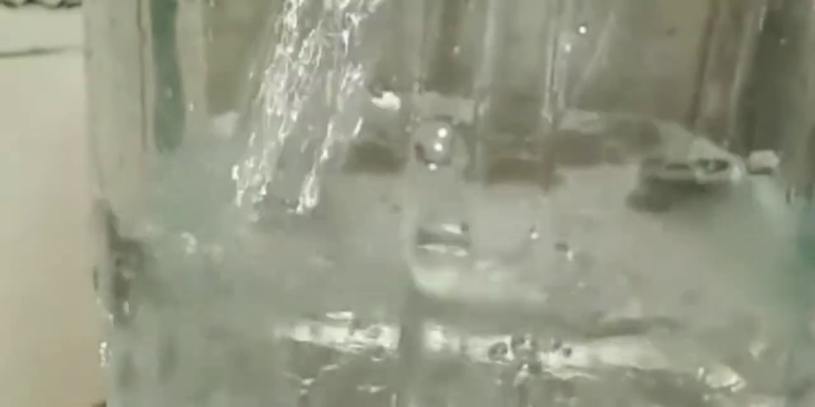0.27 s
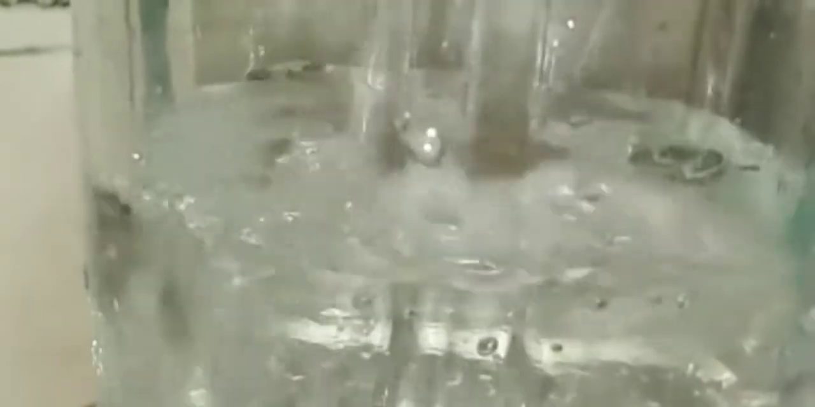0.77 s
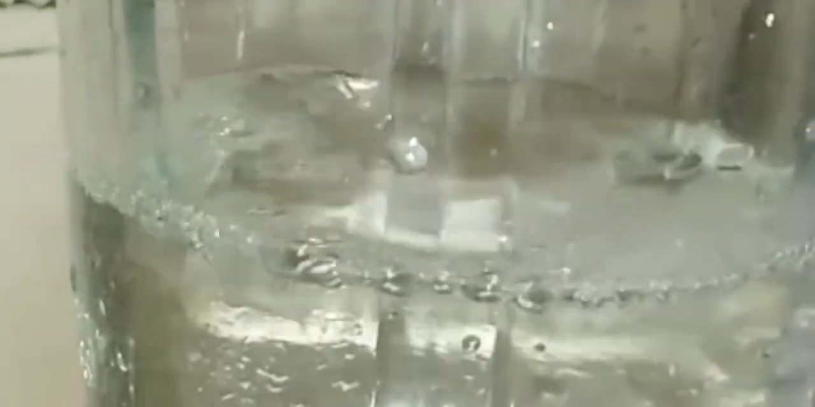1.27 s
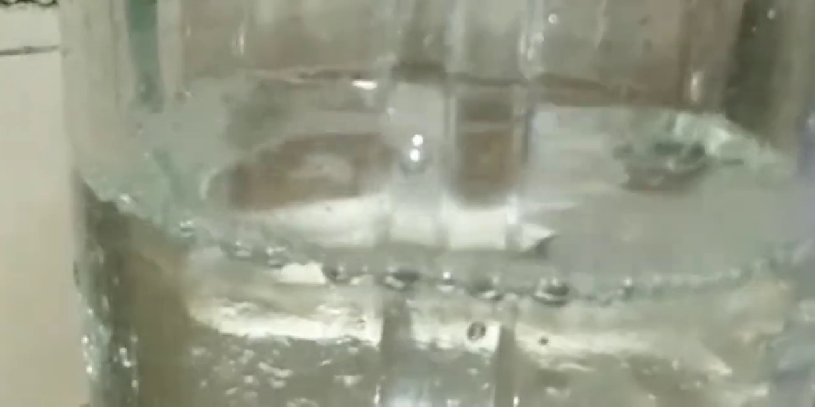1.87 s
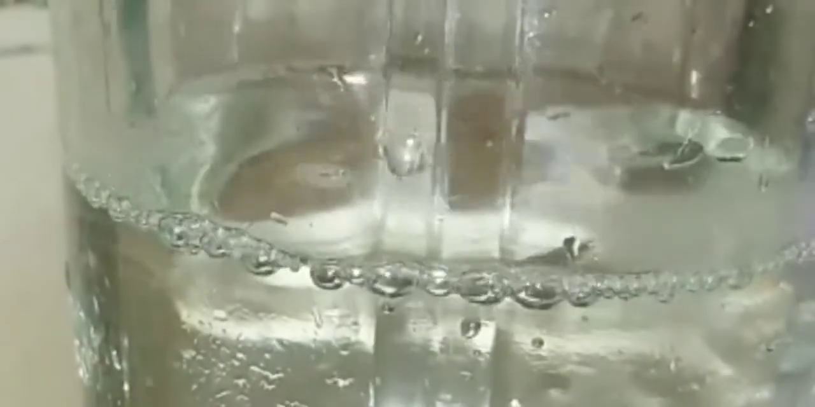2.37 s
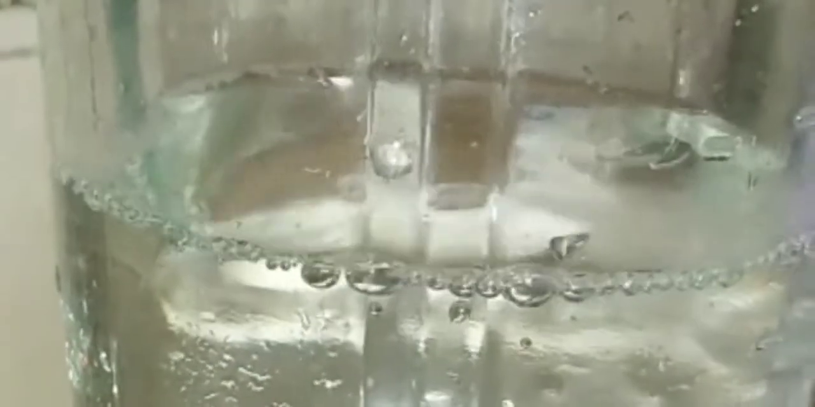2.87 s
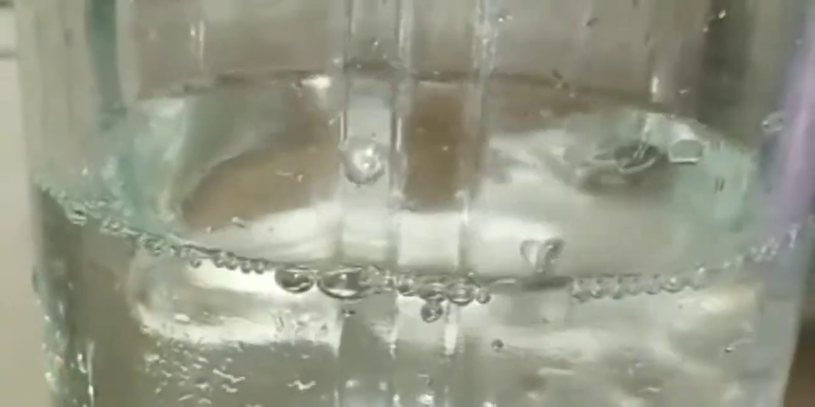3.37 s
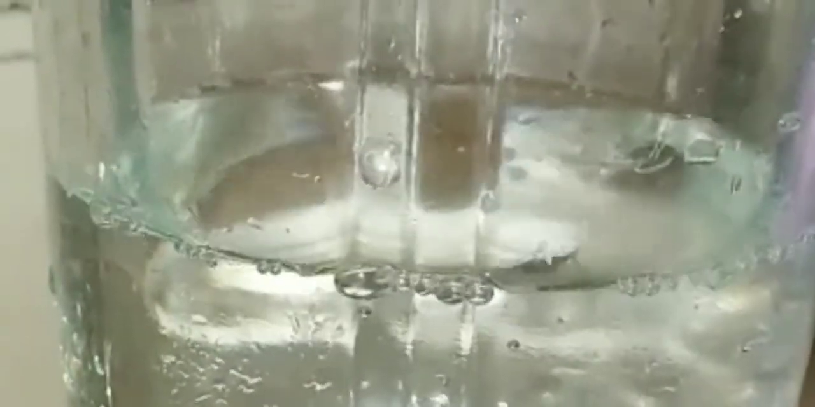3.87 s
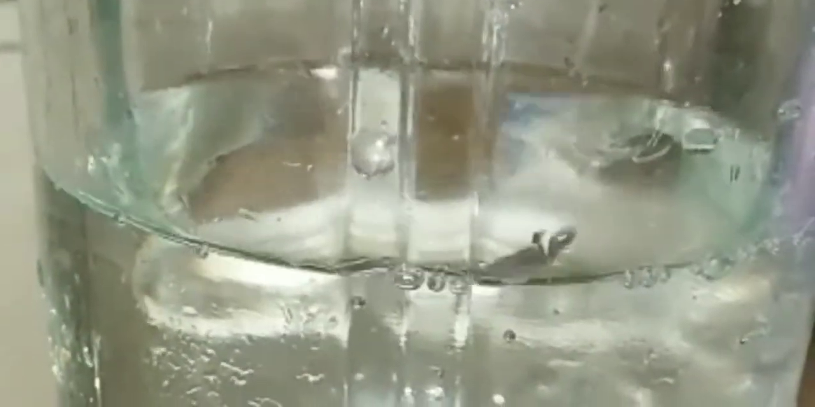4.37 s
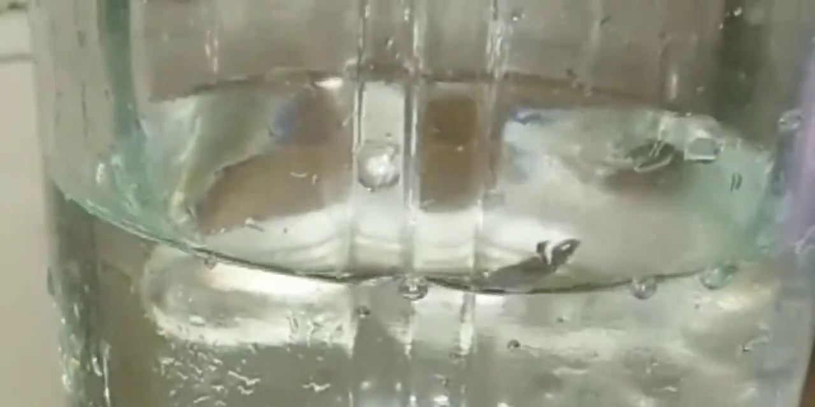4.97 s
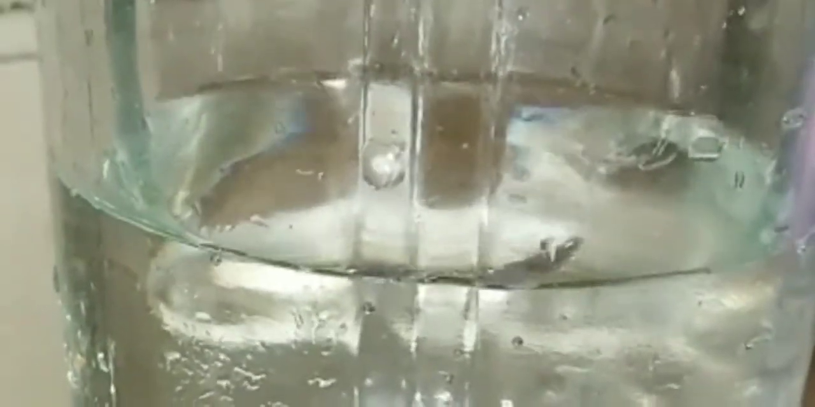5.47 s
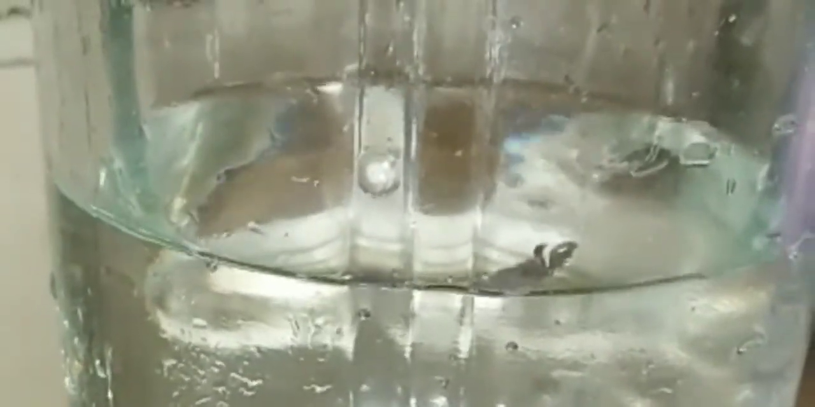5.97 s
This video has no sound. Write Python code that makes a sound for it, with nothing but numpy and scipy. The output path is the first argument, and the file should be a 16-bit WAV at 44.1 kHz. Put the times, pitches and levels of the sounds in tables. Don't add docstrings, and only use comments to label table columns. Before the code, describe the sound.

A nearby phone microphone catches a short, bubbly pour into a glass vessel, swelling slightly and then cut with a tiny dip. Round drips, wet slaps and a rustling slosh follow, with a low thump on the counter. Dull metal touches lead into two piercing, slightly overloaded glass clinks and a short rattle. Then only quiet hum, hiss and faint pipe sounds remain, before a soft brush and a loud wooden knock.

```python
import sys
import numpy as np
from scipy import signal
from scipy.fft import rfft, irfft, next_fast_len
from scipy.io import wavfile
from scipy.ndimage import uniform_filter1d

SR = 44100
rng = np.random.default_rng(int(sys.argv[2]) if len(sys.argv) > 2 else 0)


def gain_from_db(level_db):
    decades = np.asarray(level_db, float) / 20
    return 10 ** decades


def to_wav(sig):
    pcm = np.clip(np.atleast_2d(sig), -1, 1) * 32767
    pcm = np.round(pcm).astype(np.int16)
    wavfile.write(sys.argv[1], SR, pcm.T)


N = 274919
T = np.arange(N) / SR
FADE = np.log(1000)
CUT_S = 1.029


def level(x, db):
    return x * gain_from_db(db) / np.sqrt(np.mean(x ** 2))


def shape(x, gain):
    size = next_fast_len(len(x))
    hz = np.arange(size // 2 + 1) * SR / size + 1
    return irfft(rfft(x, size) * gain(hz), size)[:len(x)]


def colour(points):
    hz, db = np.transpose(points)
    return lambda f: gain_from_db(np.interp(np.log(f), np.log(hz), db))


def peak(hz, width):
    return lambda f: 1 / np.sqrt(1 + ((f - hz * hz / f) / width) ** 2)


def hiss(gain):
    return level(shape(rng.standard_normal(N), gain), 0)


def walk(rate):
    k = int(SR / rate)
    steps = np.repeat(rng.standard_normal(N // k + 1), k)
    return 1.6 * uniform_filter1d(steps, k)[:N]


def swell(s, db, rise, fall):
    return gain_from_db(db - 20 * np.maximum((s - T) / rise, (T - s) / fall))


def add(out, s, x):
    i = int(s * SR)
    out[i:i + len(x)] += x[:len(out) - i]


def ring(hz, t60, glide=0., size=4096):
    t = T[:size]
    return np.sin(2 * np.pi * hz * t * (1 + glide * t / t60)) * np.exp(-FADE * t / t60)


def puff(noise, hz, width, t60):
    t = T[:len(noise)]
    band = shape(noise, lambda f: peak(hz, width)(f) ** 2)
    x = band * np.exp(-FADE * t / t60) * np.minimum(t / 0.00097, 1)
    return x / np.abs(x).max()


def struck(force, modes):
    response = sum(gain_from_db(db) * ring(hz, min(t60, .03), size=2048) for hz, db, t60 in modes)
    return signal.fftconvolve(force, response)


# frequency in Hz, width in Hz, level in dB.
FRIDGE = [(148.5, 14, -71), (302.5, 26, -66.5), (351.4, 29, -65), (1312, 26, -69.5), (2150, 35, -79.5),
          (5800, 250, -76.5)]


def fridge():
    return sum(gain_from_db(db + 2.0 * walk(3.588)) * hiss(lambda f: peak(hz, w)(f) ** 2) for hz, w, db in FRIDGE)


# frequency in Hz, level in dB per Hz.
KITCHEN = [(30, -37), (42, -22), (60, -3), (141, -4.5), (238, -9), (270, -16), (340, 3.5), (430, -10),
           (735, -18), (1340, -15.5), (3280, -26), (6830, -20.5), (8870, -6.5), (11500, -23.5),
           (15800, -27.5)]


def kitchen():
    air_db, mains_hz, mains_db = -52, 48, -67
    air = gain_from_db(air_db + .5 * walk(3.1)) * hiss(colour(KITCHEN))
    return air + gain_from_db(mains_db) * np.sin(2 * np.pi * mains_hz * T)


# frequency in Hz, width in Hz, level in dB.
JAR = [(537.6, 52, 8), (1124, 72, -9), (1600, 170, -1), (2000, 73, 1), (2610, 61, -7), (3200, 40, -6.5),
       (4600, 64, -9), (5670, 94, -9)]


def jar():
    return sum(gain_from_db(db + 3.14 * walk(39.5)) * hiss(lambda f: peak(hz, w)(f) ** 2) for hz, w, db in JAR)


def grains(rate, lo_hz, hi_hz, cycles, spread_db):
    out = np.zeros(N)
    for when, pitch, size, life in rng.random((4000, 4))[:int(rate * 3.4)]:
        hz = lo_hz * (hi_hz / lo_hz) ** pitch
        loudness = gain_from_db(-spread_db * np.log(size + 0.00041))
        add(out, 3.7 * when, loudness * ring(hz, cycles * (.5 + life) / hz, 0.11, size=1024))
    return out / np.sqrt(np.mean(out[:int(3.4 * SR)] ** 2))


# time in
# seconds, flow in dB.
FLOW = [
    (0.0, -52.5),
    (0.11, -50.5),
    (0.27, -53.5),
    (0.36, -50),
    (0.53, -49),
    (0.65, -48),
    (0.79, -47.5),
    (0.92, -46),
    (0.995, -61),
]
# peak time in seconds, slosh in dB, rustle in dB, time to fall 20 dB in seconds.
LURCHES = [(1.06, -47, -65, 0.57), (1.178, -46, -53, .15), (1.207, -40.5, -47, 0.17),
           (1.382, -48, -53.5, .3), (1.701, -35, -36.5, .09), (1.846, -37, -32.5, 0.06),
           (1.91, -46.5, -54, 0.43), (2.11, -55.5, -57.5, 0.15), (2.43, -66, -55, 0.1),
           (2.77, -66, -50, .12), (2.86, -42, -54, .2), (3.16, -57, -70, 0.3)]


def water():
    flow = gain_from_db(np.interp(T, *np.transpose(FLOW))) * (T < CUT_S)
    bubbling = flow * gain_from_db(7 * T)
    fizz = flow * gain_from_db(-4.5 - 2 * T)
    spray = flow * gain_from_db(1.5 - 3 * T)
    resonance = flow * gain_from_db(-1 - 19 * T ** 2)
    rise = 0.006
    slosh = sum(swell(s, db, rise, fall) for s, db, _, fall in LURCHES) * (T > CUT_S)
    rustle = sum(swell(s, db, rise, 0.68 * fall) for s, _, db, fall in LURCHES) * (T > CUT_S)

    swarm = grains(800, 500, 3200, 36, 2.7) + .2 * hiss(peak(1200, 2000))
    gurgle = level(shape(swarm, peak(1420, 860)), -3)
    lapping = level(shape(swarm, lambda f: peak(1500, 1200)(f) ** 2), -5.5)
    churn = gain_from_db(-7 + 3.0 * walk(19.8)) * hiss(lambda f: peak(270, 300)(f) ** 2)
    beads = grains(450, 2400, 7000, 90, 2.8)
    air = hiss(peak(4000, 4000))
    small = .95 * beads + .15 * air
    mist = gain_from_db(-8.0) * grains(650, 6020, 12400, 90, 3.8)
    mist += gain_from_db(-4.5 + 1.0 * walk(38.8)) * hiss(peak(7000, 6000))

    stream = bubbling * (gurgle + churn) + 0.59 * resonance * jar() + fizz * small + spray * mist
    return stream + slosh * lapping + rustle * (0.46 * small + 0.5 * air)


# time in seconds, peak in dB, bubble frequency in Hz.
GULPS = [(0.034, -46, 534), (0.119, -43, 2600), (0.15, -31.5, 1950), (0.232, -35.5, 1600),
         (0.257, -29.5, 590), (0.354, -32.5, 2000), (0.408, -38, 3130), (0.458, -35, 2614),
         (0.489, -39, 1950), (0.54, -31, 920), (0.577, -34, 1110), (0.647, -34, 548), (0.686, -33, 775),
         (0.749, -28.5, 647), (0.873, -27, 1406), (0.886, -29, 1006), (0.904, -28, 1000),
         (0.943, -28.5, 1465), (0.96, -34, 1455), (0.984, -28, 1324)]
# time in seconds, peak in dB, bubble frequency in Hz.
DRIPS = [(1.073, -36, 1030), (1.093, -31, 1073), (1.123, -36, 1434), (1.177, -29, 1394),
         (1.233, -27.5, 1005), (1.31, -42, 1510), (1.453, -30, 1524), (1.645, -32.5, 1240),
         (1.71, -32, 1160), (1.768, -31.5, 873), (1.859, -26.5, 1165), (1.951, -41, 1460),
         (1.979, -41, 937), (2.015, -32, 2040), (2.068, -43, 1190), (2.238, -41, 1300), (2.28, -45, 496),
         (2.351, -40, 1120), (2.546, -36, 1370), (2.941, -38, 1150), (2.974, -42, 1095)]
# time in seconds, peak in dB, bubble frequency in Hz.
SLAPS = [
    (1.205, -30.5, 1004),
    (1.379, -40, 930),
    (1.915, -33.5, 1160),
    (2.111, -38.5, 1090),
    (2.149, -42, 1273),
    (2.858, -31, 497),
    (2.879, -38.5, 1540),
    (2.909, -39, 790),
    (3.749, -46, 1240),
]


def drops():
    out = np.zeros(N)
    kinds = (GULPS, -21, 0.068), (DRIPS, -31, 0.045), (SLAPS, -5.5, 0.044)  # table, spray dB, t60 s
    rows = sorted((*row, spray_db, t60) for table, spray_db, t60 in kinds for row in table)
    for (s, db, hz, spray_db, t60), noise in zip(rows, rng.standard_normal((len(rows), 4096))):
        bubbles = .68 * ring(hz, t60, .04) + .3 * ring(1.37 * hz, .6 * t60, .05)
        slap = .5 * puff(noise, max(hz, 1400), 1240, 0.8 * t60)
        spray = gain_from_db(spray_db) * puff(noise, 4700, 4100, 1.4 * t60)
        add(out, s - .001, gain_from_db(db) * (bubbles + slap + spray))
    return out


# time in seconds, peak in dB, centre in Hz, relative body in dB.
TICKS = [(0.0794, -26.5, 8000, -9), (0.1161, -30, 8400, -11), (0.1984, -33, 8700, -4),
         (0.251, -34, 8700, -9), (0.2804, -45.5, 4700, -17), (0.409, -32, 9240, -20),
         (0.424, -33, 8610, -15), (0.565, -24, 8370, -31), (0.6377, -40, 4120, 2), (0.673, -40, 5730, -11),
         (0.7153, -36.5, 5450, -7), (0.7526, -33.5, 8800, -1), (0.777, -31.5, 8320, -27),
         (0.8111, -30.5, 9500, -16), (0.8356, -34, 8600, -12), (0.843, -23.5, 8700, -10.5),
         (0.879, -41, 8960, -2), (0.8993, -39.5, 8900, 12.5), (1.4547, -40, 9020, -0.5),
         (1.698, -34, 9250, -10), (1.71, -35, 5370, 4), (1.8443, -32.5, 7650, 2), (2.9404, -42, 9000, -13),
         (2.9696, -41, 9250, -12), (3.1604, -35.5, 8400, -23), (5.5013, -34, 8250, -13),
         (5.784, -30, 8700, -35), (5.823, -42, 8700, -10)]


def ticks():
    out, t60 = np.zeros(N), 0.053
    for (s, db, hz, body_db), noise in zip(TICKS, rng.standard_normal((len(TICKS), 4096))):
        crack = gain_from_db(-np.interp(hz, *np.transpose(PORT))) * puff(noise, hz, 0.41 * hz, t60)
        body = gain_from_db(body_db) * puff(noise, 2400, 3500, t60)
        add(out, s - .001, gain_from_db(db) * (crack + body))
    return out


# time in seconds, level in dB, frequency in Hz, t60 in seconds.
SETDOWN = [
    (1.847, -30, 109.2, 0.31),
    (1.849, -28, 180, .1),
    (0.77, -42, 113, 0.34),
    (0.848, -32, 264, 0.034),
    (1.049, -43, 90, .1),
    (1.70, -34.5, 218, 0.055),
    (2.721, -39.5, 162, 0.14),
]


def setdown():
    out = np.zeros(N)
    for s, db, hz, t60 in SETDOWN:
        add(out, s, gain_from_db(db) * ring(hz, t60, size=16384))
    return out


# time in s, length in s,
# frequency in Hz, level in dB.
PIPES = [
    (2.46, .04, 4250, -69),
    (2.86, .07, 4200, -66),
    (3.15, .05, 4200, -67),
    (3.26, .02, 4200, -66),
    (3.3, .1, 1500, -72),
    (3.95, .16, 600, -66),
    (4.1, .2, 1500, -68),
    (4.6, .15, 1500, -74),
    (5.4, .15, 1500, -74),
]


def pipes():
    out = np.zeros(N)
    for s, length, hz, db in PIPES:
        swelling = np.exp(-((T - s) / length) ** 2)
        out += gain_from_db(db) * swelling * hiss(lambda f: peak(hz, .035 * hz)(f) ** 2)
    return out


# time in seconds, level in dB, rise in seconds, chatter in seconds, dull body in dB.
CLINKS = [
    (2.6916, -20, 0.00042, 0.0054, -1.5),
    (2.7030, -24.5, .0005, 0.0056, 0),
    (2.715, -24, 0.00034, 0.0011, 1.5),
    (2.7182, 4, 0.00028, 0.0073, -33),
    (2.7462, 4.5, .002, 0.0044, -36),
]
# frequency in Hz, level in dB, t60 in seconds.
GLASS = [(4900, -28, 0.06), (5580, -10.5, 0.012), (6500, -13, 0.022), (8400, -2, 0.012), (8680, -3, 0.011),
         (9250, 2, 0.011), (10000, -21, 0.045), (11350, -18, 0.017), (12970, -35, 0.019),
         (15000, -28, 0.009)]
# frequency in Hz, level in dB, t60 in seconds.
HANDLE = [(780, -34, 0.0057), (1510, -1, 0.023), (2200, -20, 0.0049), (2860, -2.5, 0.033),
          (3680, -15, 0.0088), (4350, -4, 0.017), (5270, 1.5, 0.022), (5900, 1, .012), (7000, -6, 0.012),
          (10050, -12, 0.0091)]


def clinks():
    out, t = np.zeros(N), T[:2048]
    for (s, db, rise, chatter, dull_db), noise in zip(CLINKS, rng.standard_normal((len(CLINKS), 2048))):
        force = 0.037 * noise * np.minimum(t / rise, 1) * np.exp(-(t / chatter) ** 4)
        force[int(rise * SR)] += 0.39 * min(0.00075 / rise, 1)
        shiver = force + 0.034 * noise * np.exp(-t / 0.018)
        add(out, s, gain_from_db(db) * (struck(force, GLASS) + gain_from_db(dull_db - 1.5) * struck(shiver, HANDLE)))
    return out


# peak time in seconds, level in dB, time to rise 20 dB and to fall 20 dB in seconds.
STROKES = [
    (2.79, -46, 0.06, 0.14),
    (2.838, -41, 0.08, 0.05),
    (2.875, -45, 0.07, .07),
    (3.17, -50, 0.1, .05),
    (3.75, -60, 0.5, 0.4),
    (5.92, -52, 0.8, 0.25),
]


def brush():
    def bright(f):
        lines = 0.21 * peak(6000, 500)(f) + 0.15 * peak(4250, 250)(f)
        lines += 0.13 * peak(5100, 300)(f) + 0.12 * peak(12500, 700)(f)
        return peak(8500, 2600)(f) ** 2 + lines
    return sum(swell(*row) for row in STROKES) * gain_from_db(1.8 * walk(200)) * hiss(bright)


# time in seconds, level in dB.
KNOCKS = [
    (5.9468, -7),
    (5.9564, -17),
    (6.026, -27),
]
# frequency in Hz, level in dB, twice the t60 in seconds.
WOOD = [(405, 6.5, 0.25), (504, -22, 0.98), (560, -18, 0.31), (650, -10, 0.27), (790, -27, 0.16),
        (980, -29, 0.42), (1123, -19, 0.22), (1310, 2, 0.19), (1680, -14, 0.19), (1890, -24, 0.33),
        (2277, -25, 0.18), (2536, -37, 0.38)]


def knocks():
    out, t = np.zeros(N), T[:256] - T[128]
    knock_hz, contact_s = 830, .0007
    blow = np.cos(2 * np.pi * knock_hz * t) * np.exp(-(t / contact_s) ** 2)
    blow = blow - blow.mean() * np.hanning(256) * 2
    noise = rng.standard_normal(16384)
    modes = sum(gain_from_db(db - 17.5) * ring(hz, .5 * t60, size=16384) for hz, db, t60 in WOOD)
    dense = gain_from_db(-18.5) * puff(noise, 1250, 400, 0.14) + gain_from_db(-9.5) * puff(noise, 560, 450, 0.31)
    hollow = gain_from_db(-21) * puff(noise, 610, 240, 0.67) + gain_from_db(-25) * puff(noise, 247, 160, 0.45)
    crack = gain_from_db(-16.5) * puff(noise, 4000, 4000, 0.027) + gain_from_db(-27.0) * puff(noise, 3200, 2200, 0.32)
    for s, db in KNOCKS:
        add(out, s - T[128], gain_from_db(db + 6) * blow)
        add(out, s + .0008, gain_from_db(db) * (modes + dense + hollow))
    first_s, first_db = KNOCKS[0]
    add(out, first_s - .001, gain_from_db(first_db) * crack)
    return out


# frequency in Hz, t60 in seconds.
ROOM = [(300, 1), (1000, 0.21), (3000, 0.39), (9000, 0.16)]


def room(x):
    reverb_db = -12
    t, noise = T[:SR // 2], rng.standard_normal(SR // 2)
    tail = sum(shape(noise, peak(hz, hz)) * np.exp(-FADE * t / t60) for hz, t60 in ROOM)
    tail *= np.minimum(t / 0.0026, 1)
    tail /= np.sqrt(np.sum(tail ** 2))
    return x + gain_from_db(reverb_db) * signal.fftconvolve(x, tail)[:N]


# frequency in Hz, gain in dB.
PORT = [(40, -25), (90, -4), (200, -5.5), (5000, -4.5), (7000, -3.5), (8700, 6.5), (10200, -5),
        (13000, -4.5), (16000, -14)]


def port(x):
    return shape(x, colour(PORT))


def scene():
    near = room(water() + drops() + ticks() + clinks() + brush()) + knocks() + setdown()
    mono = port(near) + kitchen() + fridge() + pipes()
    return np.array([mono, mono])


def low_pass(x):
    return signal.sosfilt(signal.butter(12, 15950, fs=SR, output="sos"), x)


def record(dry):
    fade_out_s, silent_s, fade_in_s = .026, .004, .018
    late = T - CUT_S
    fade_s = np.where(late < 0, fade_out_s, fade_in_s)
    fade = np.clip((np.abs(late) - silent_s) / fade_s, .05, 1) ** 2
    clipped = 0.76 * np.tanh(dry / 0.78)
    top = signal.ellip(8, .2, 60, 15800, fs=SR, output="sos")
    return low_pass(signal.sosfilt(top, clipped) * fade)


dry = scene()
out = record(dry)
to_wav(out)
```